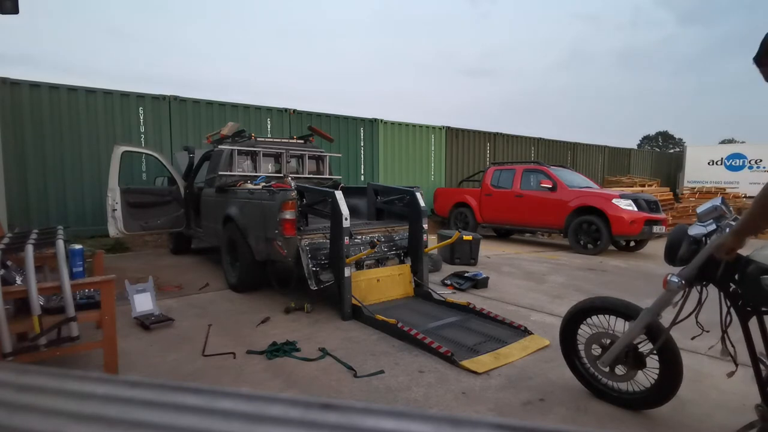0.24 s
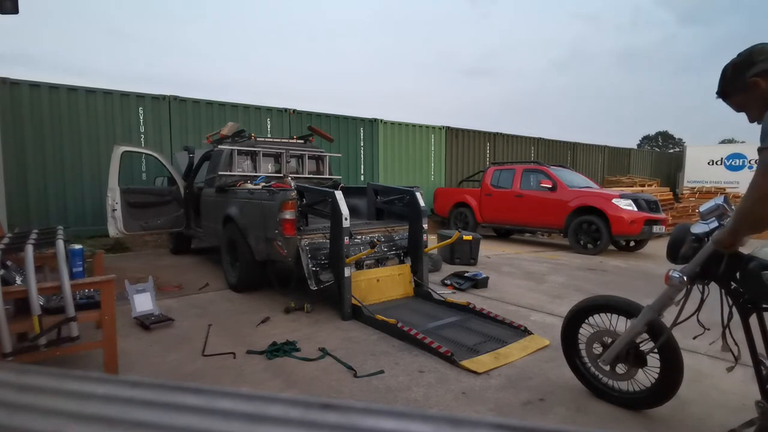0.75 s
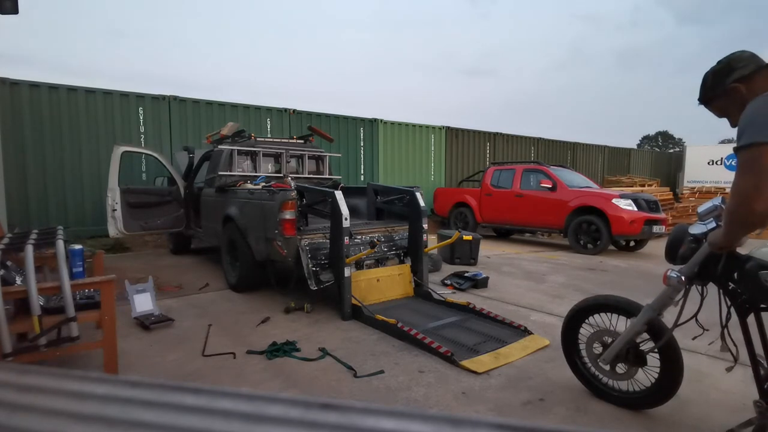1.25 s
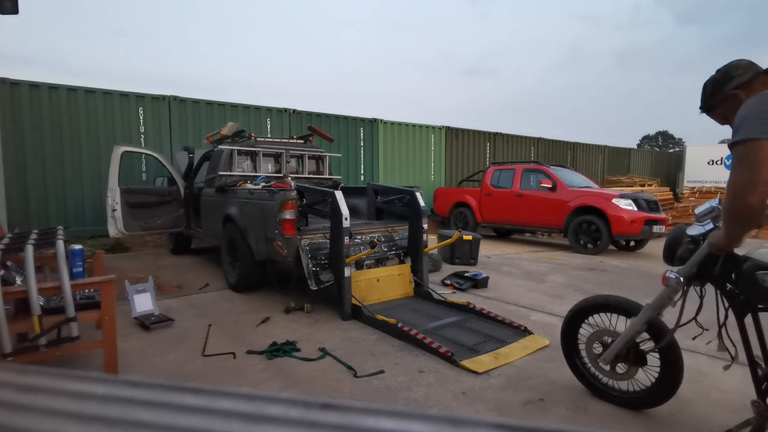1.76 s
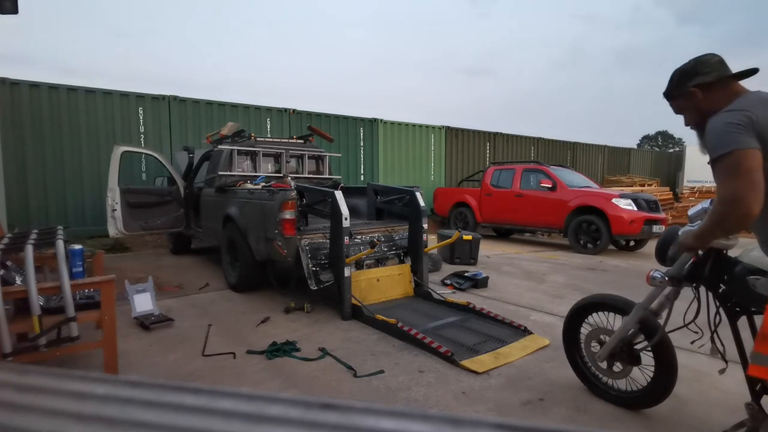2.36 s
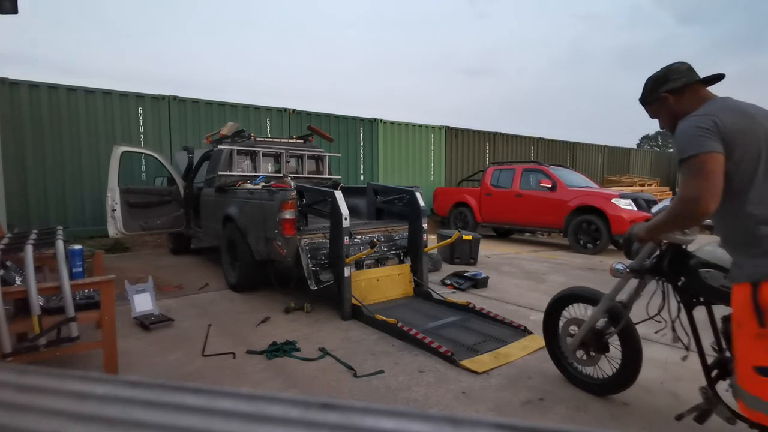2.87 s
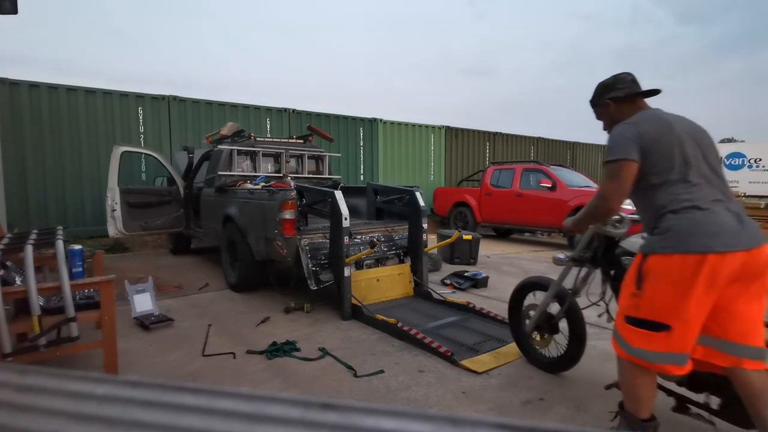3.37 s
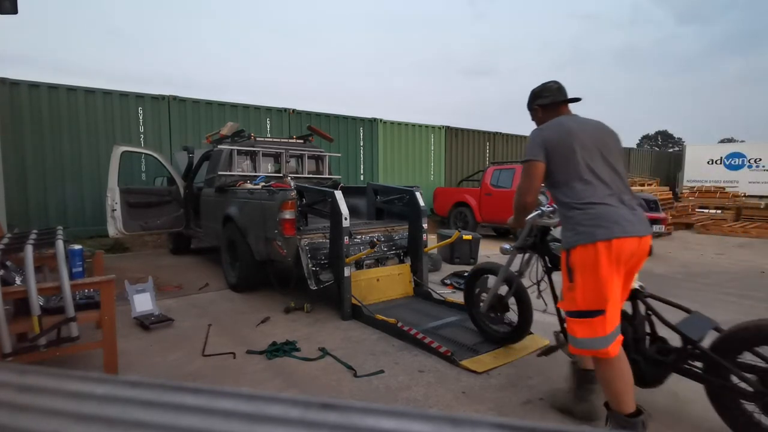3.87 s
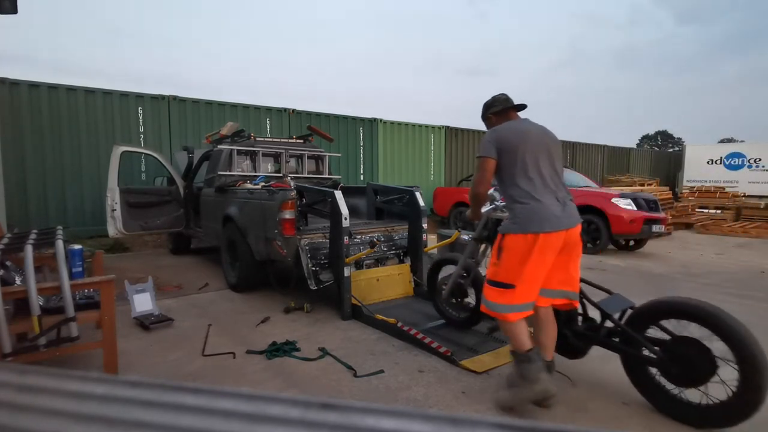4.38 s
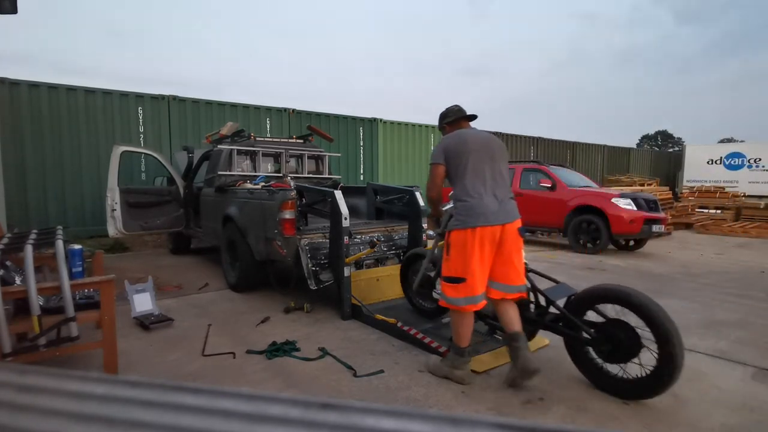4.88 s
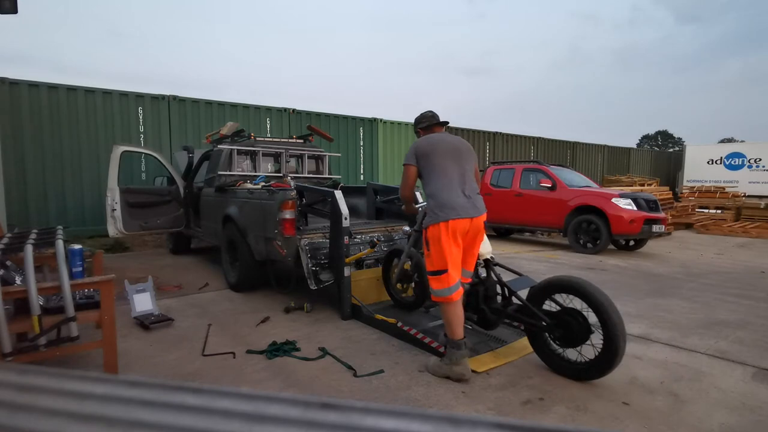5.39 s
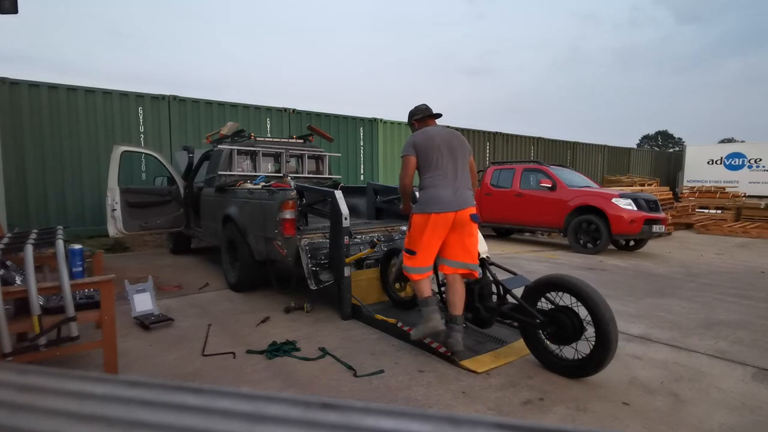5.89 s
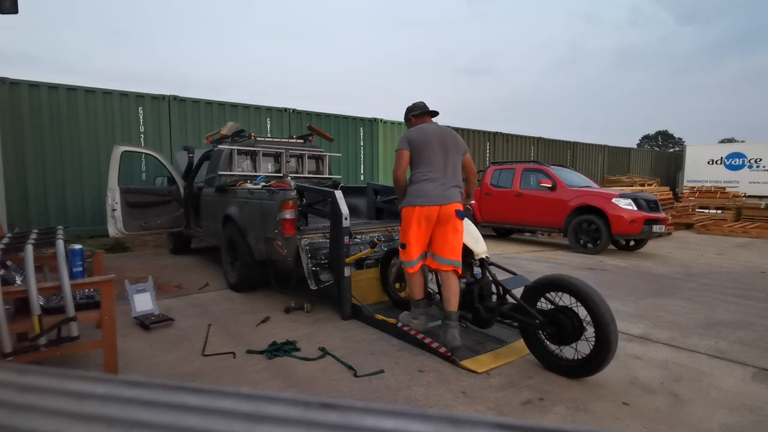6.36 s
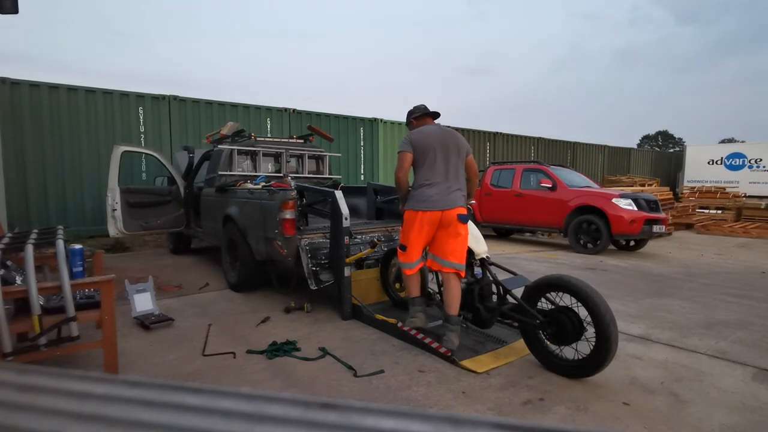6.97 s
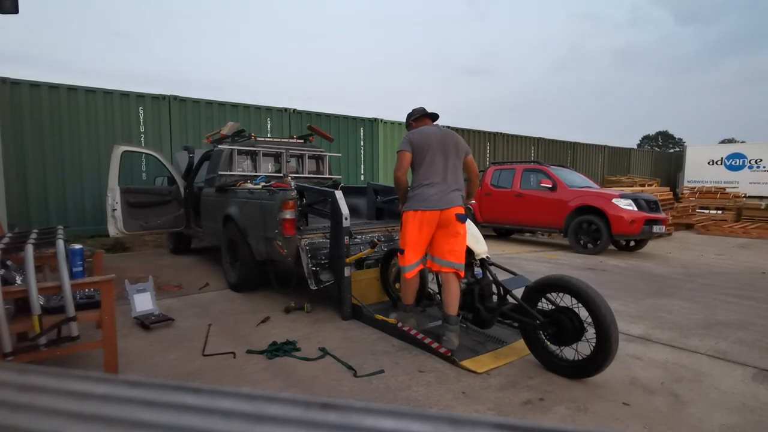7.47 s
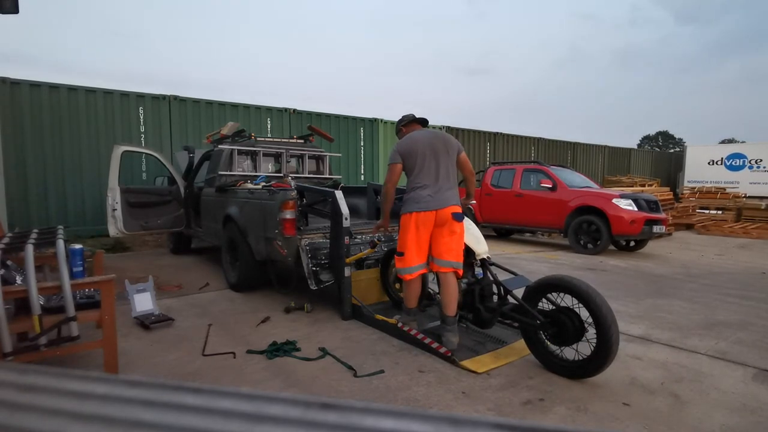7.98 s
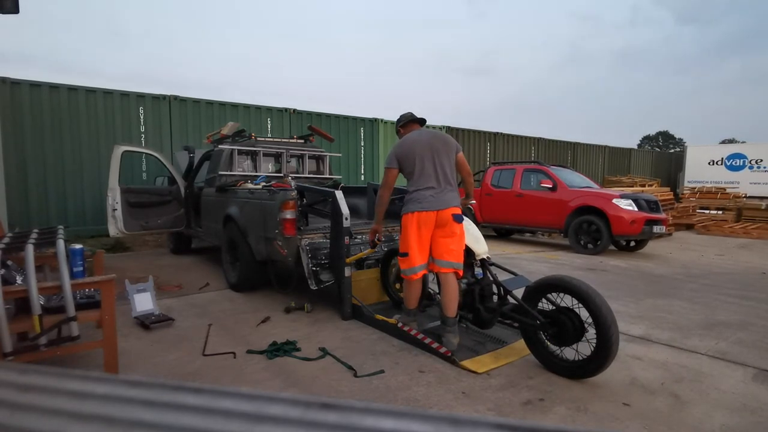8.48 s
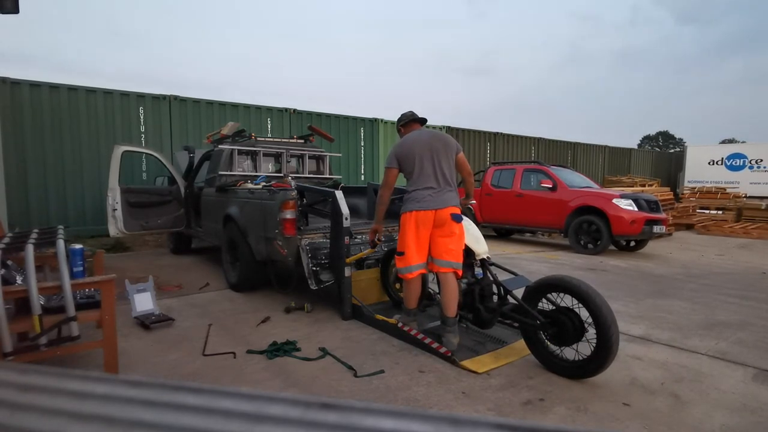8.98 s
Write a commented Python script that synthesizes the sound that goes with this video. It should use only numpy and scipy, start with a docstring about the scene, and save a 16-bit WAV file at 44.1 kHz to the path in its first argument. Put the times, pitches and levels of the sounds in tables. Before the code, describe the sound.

A sharp metallic stand snap echoes outdoors, followed by footsteps, a rubbing tyre and heavy rattling clunks as a motorcycle rolls onto a steel lift.

```python
"""A motorcycle, engine off, is wheeled across a concrete yard onto the steel platform of a lift.
Its side stand bangs up: sharp cracks excite ringing modes, and a row of ribbed containers answers with a chirp.
The tyre groans as filtered stick-slip noise; the platform clanks and booms in swarms of contacts and low swings.
Boots scuff and thud, far engines hum in the open air, and the microphone housing dulls the treble."""
import sys
import numpy as np
from scipy import signal
from scipy.fft import rfft, irfft, next_fast_len
from scipy.io import wavfile
from scipy.ndimage import uniform_filter1d, minimum_filter1d

SR = 44100
rng = np.random.default_rng(int(sys.argv[2]) if len(sys.argv) > 2 else 0)


def unload_wav(signal):
    """Save mono or channel-first audio to the path in sys.argv[1] as 16-bit WAV at rate SR, clipped to [-1, 1]."""
    wavfile.write(
        sys.argv[1],
        SR,
        np.round(np.clip(np.atleast_2d(signal).T, -1, 1) * 32767).astype(np.int16),
    )


N = 407484

# open air with far traffic, relative noise spectrum: (frequency [Hz], level [dB])
AIR_TONE = [(20, -1), (40, 3), (60, 7), (110, 1.5), (330, -3.5), (620, -3.5), (900, -3), (1060, -0.5),
            (1210, 4), (1480, -5), (1850, -3), (3200, -17.5), (5500, -21), (8500, -18), (15000, -9)]
AIR_DB, AIR_DRIFT_DB_PER_S = -54.5, -0.1321
# two far engines change speed: (time [s], pitch [Hz])
WHINE_PITCH = [(2.5, 398), (4.5, 494), (5.9, 450), (6.7, 455.8), (7.4, 427.6), (9.24, 455)]
HUM_PITCH = [(7.6, 177.9), (8.8, 215.3), (9.24, 203.5)]
# each is loudest as it passes: (time [s], level [dB], fall to either side [dB/s])
WHINE_PASS, HUM_PASS = (5.3, -65.5, 2.5), (9.2, -65.5, 1.3)

# how long the yard's tail takes to fall by 60 dB: (frequency [Hz], t60 [s])
YARD_DECAY = [(100, .7), (400, 1.2), (1100, 1.35), (2500, 1.5), (5500, 0.67), (9000, .6), (14000, 0.59)]
# a van, the containers and the far side of the yard answer:
# (delay [s], level [dB], rise [s], decay [s], high edge [Hz])
YARD_ECHOES = [(.125, -27, .035, .045, 5000), (.288, -32.5, .006, .075, 6010), (.39, -36, .04, .07, 2610)]

# a boot lands and its sole drags on gritty concrete or tread plate:
# (time [s], sole level [dB], drag build-up [s], grit pitch [Hz], heel level [dB])
BOOT_STEPS = [(.17, -54.5, 0.13, 4650, -63), (0.299, -39.5, 0.046, 2780, -61),
              (.859, -41, 0.015, 3630, -49.5), (.925, -48.5, .008, 2394, -40),
              (1.005, -55.5, .008, 2680, -56), (1.449, -58, 0.005, 3830, -68),
              (1.61, -48, 0.081, 3000, -69), (2.35, -50, 0.031, 6240, -69),
              (2.915, -52.5, 0.022, 3600, -71), (3.017, -51.5, 0.0078, 3500, -66),
              (3.362, -35, 0.034, 3100, -44.5), (4.074, -44, 0.0058, 3690, -48),
              (4.095, -45, 0.009, 3615, -66), (4.663, -41, 0.037, 3700, -56),
              (6.62, -49.5, 0.031, 3600, -58), (7.015, -49.5, 0.018, 3200, -62),
              (7.044, -39.5, .008, 3240, -47.5), (7.131, -49, .004, 2700, -52.5),
              (7.165, -54.5, .008, 3050, -60)]
# tone of a sole on concrete: (frequency [Hz], level [dB])
SOLE_TONE = [(1200, -2.5), (2300, 4.5), (3500, -3.5), (5500, 0.5), (9000, -1)]
SOLE_DECAY_S, SOLE_SPREAD = .029, 1.75  # the grit spans this ratio below and above its pitch
HEEL_HZ, HEEL_DECAY_S = 241, 0.021
# the boots shift lightly between steps: (start [s], end [s], level [dB])
BOOT_SHUFFLES = [(0.546, .65, -62), (1.12, 1.18, -61.5), (2.578, 2.9, -57.5), (7.562, 7.78, -62)]
SHUFFLES_PER_S, SHUFFLE_DRAG_S, SHUFFLE_HZ = 19, .02, 3600

# a faint hiss and low rumble swell and fade as the bike moves; levels are those at the fullest
MOVE_START_S, MOVE_FULLEST_S, MOVE_STOP_S = 1.4, 3.7, 6.7
HISS_DB, RUMBLE_DB = -63, -62.5
# dull low thuds of heels, tyres and frame: (time [s], level [dB], pitch [Hz], decay [s])
LOW_THUDS = [(2.574, -36.5, 269, 0.0058), (3.59, -50, 584, 0.026), (3.701, -47, 418, 0.084),
             (3.875, -41, 401, 0.049), (5.438, -42, 235.3, 0.026), (5.629, -34.5, 194, 0.013),
             (5.882, -52.5, 263, 0.026), (6.823, -48.5, 329, .01), (6.846, -44, 275, .019),
             (7.903, -47.5, 301.5, 0.0072), (7.985, -55, 380, 0.065)]
# brief narrow squeaks, rings and knocks: (time [s], level [dB], length [s], pitch [Hz])
NARROW_SOUNDS = [(.55, -59.5, 0.046, 5180), (1.002, -51.5, 0.033, 2060), (6.632, -45, 0.022, 850),
                 (7.043, -39, 0.041, 2274), (7.132, -49, 0.019, 2360), (7.324, -63.5, .04, 5030),
                 (7.623, -57, 0.031, 5140), (7.67, -67.5, 0.083, 4970), (8.351, -69, 0.13, 4930),
                 (8.739, -42, 0.013, 5830), (8.752, -45, 0.019, 5200)]
NARROW_SWELL = .33  # share of its length in which each builds up
# small metal parts click: (time [s], level [dB], decay [s], pitch [Hz])
METAL_CLICKS = [(6.559, -38.5, 0.025, 7050), (6.869, -57, .008, 9500), (7.05, -51, .028, 9200),
                (8.738, -49, .006, 5590), (8.750, -34.5, 0.011, 9220)]
CLICK_RISE_S, CLICK_SPREAD = 0.0067, 1.6  # spread: ratio below and above the pitch

# the whole platform bounces on its arms: (time [s], level [dB], pitch [Hz], decay [s], length [s])
PLATFORM_BOUNCES = [(5.641, -26, 80, 0.019, 0.092), (5.677, -39.5, 100.4, 0.069, 0.1),
                    (5.772, -41, 76.4, 0.037, 0.15), (5.885, -33.5, 84, 0.015, 0.09),
                    (5.893, -36.5, 63.5, 0.15, 0.17)]
# loose steel of platform and bike rattles as the load shifts:
# (time [s], rattle level [dB], decay [s], pitch [Hz], panel thud level [dB])
STEEL_CLANKS = [(3.673, -30, 0.025, 1954, -53), (3.849, -46, 0.036, 1090, -53),
                (5.531, -25, 0.032, 1840, -38), (5.560, -34.5, 0.036, 1060, -38.5),
                (5.638, -43.5, 0.035, 2700, -40), (5.724, -30, .018, 1960, -38),
                (5.770, -35.5, 0.02, 890, -38), (6.940, -44, 0.043, 2080, -61),
                (7.946, -35, .025, 1900, -48.5), (8.596, -50.5, 0.034, 1800, -64.5)]
# what the platform rings with: (frequency [Hz], relative level [dB], t60 [s])
PLATFORM_MODES = [(568, 1.5, 0.086), (659, -5, 0.16), (1032, -6, 0.25), (1220, -7.5, 0.27),
                  (1446, 5.5, 0.059), (1572, 5.5, 0.055), (1723, -11, 0.1), (1887, -1, 0.14),
                  (2076, -1.5, 0.049), (2133, 5.5, 0.052), (2650, -5.5, 0.081), (2820, -15, 0.18),
                  (3220, -6, 0.043), (3650, -34, 0.049), (4030, -10, 0.03), (4850, -0.5, 0.055)]
CLANK_RISE_S, CLANK_SPREAD = 0.0037, 2.22  # the rattle spans this ratio below and above its pitch
PANEL_HZ, PANEL_DECAY_S = 322, 0.042

# the tyre is shoved along the plate; each shove grabs and then eases: (time [s], level [dB], length [s])
TYRE_SHOVES = [(5.176, -42.5, .1), (5.277, -47, .11), (5.366, -47.5, 0.17)]
SHOVE_ATTACK_S, SHOVE_RELEASE_S = 0.013, 0.083
# resonances that sing under the rubbing tyre: (frequency [Hz], width [Hz], relative level [dB])
TYRE_PEAKS = [(569, 38, -3.5), (721, 13, -6), (1186, 16, 2.5), (1454, 39, -3.5), (1825, 60, -7.5),
              (2050, 19, -4), (2450, 35, -7.5), (2860, 33, -13)]

# the stand hits the frame and chatters: (time [s], force [dB])
STAND_HITS = [(1.7549, -11), (1.7569, 6), (1.7625, 4.5), (1.769, -8.5)]
# what stand and frame ring with: (frequency [Hz], level at zero force [dB], t60 [s])
FRAME_MODES = [(423, -33, 0.18), (769, -30.5, 0.16), (953, -32.5, .25), (1090, -32, .22), (1167, -23, 0.35),
               (1404, -33.5, 0.29), (1470, -32.5, 0.038), (2000, -18, .055), (2080, -18, 0.088),
               (2308, -23.5, 0.035), (2480, -25.5, 0.06), (2977, -21.5, 0.1), (3340, -30, .09),
               (3700, -21.5, 0.059), (4770, -20.5, 0.036), (5065, -24, 0.063), (5850, -23.5, .045)]

# the shaded left port against the right one: (frequency [Hz], relative level [dB])
PORT_SHADE = [(100, -7), (400, -8.5), (1000, -10.5), (2000, -18.5), (3600, -15.5), (5200, -22.5),
              (7000, -14.5), (9000, -6.5), (11000, -11.5), (15000, -10.5)]
# its phase beyond the plain delay: (frequency [Hz], phase [rad])
PORT_PHASE = [(60, -.12), (400, -0.41), (1000, -0.23), (2200, 0.16), (3500, -0.0041), (6000, -0.18)]
# how alike the ports hear: (frequency [Hz], likeness [0-1])
PORT_LIKENESS = [(200, 1), (1300, 0.86), (2100, 1), (3200, .7), (5000, 0.16)]
PORT_DELAY_S = 8e-5
# the housing's treble loss: (frequency [Hz], level [dB])
HOUSING_TONE = [(5600, 0), (6300, -5.5), (7200, -10), (8600, -19.5), (10000, -25), (14500, -30)]
EDGE_HZ = 15100  # upper limit of the whole band


def amp(db):
    """Decibels to an amplitude factor."""
    return 10 ** (np.asarray(db) / 20)


def evened(x):
    """Scales x to rms 1."""
    return x / np.sqrt(np.mean(x ** 2) + 1e-20)


def read(points, hz):
    """Reads a spectrum table on a log-frequency axis."""
    f, value = np.transpose(points)
    return np.interp(np.log(hz + 1), np.log(f + 1), value)


def follow(rows):
    """A (time [s], value) curve at every sample."""
    return np.interp(np.arange(N) / SR, *np.transpose(rows))


def add(mix, s, sound):
    """Lays a sound into the mix at s seconds, cut at the end."""
    part = mix[round(s * SR):][:len(sound)]
    part += sound[:len(part)]


def colour(x, points):
    """Shapes x by a (frequency [Hz], level [dB]) table."""
    hz = np.fft.rfftfreq(len(x), 1 / SR)
    return irfft(rfft(x) * amp(read(points, hz)), len(x))


def band(x, low_hz, high_hz, order=2):
    """High-pass and low-pass in series."""
    for hz, kind in ((low_hz, "high"), (high_hz, "low")):
        b, a = signal.butter(order, min(hz, SR / 2 - 1000), kind, fs=SR)
        x = signal.lfilter(b, a, x)
    return x


def around(hz, spread):
    """The edges of a band that spans a ratio below and above hz."""
    return hz / spread, hz * spread


def slow(count):
    """Smooth random drift of rms 1 that changes over about count samples."""
    smooth = uniform_filter1d(rng.standard_normal(N), count)
    return evened(uniform_filter1d(smooth, count))


def swell_and_decay(t, rise, decay):
    """A straight rise over an exponential decay that begins at its top; all in seconds."""
    return np.minimum(t / rise, 1) * np.exp(-np.maximum(t - rise, 0) / decay)


def ring(modes):
    """One second of decaying modes, neighbours in opposite sign."""
    t = np.arange(SR) / SR
    out = np.zeros(SR)
    for k, (hz, db, t60) in enumerate(modes):
        out += (-1) ** k * amp(db - 60 * t / t60) * np.sin(2 * np.pi * hz * t)
    return out


def contacts(rise, decay, low_hz, high_hz, grain_db):
    """A swarm of tiny uneven impacts that swells and dies away; they come in clumps."""
    t = np.arange(SR) / SR
    grains, clumps = rng.standard_normal((2, SR))
    grains = np.repeat(grains, 30)[:SR]  # each grain lasts 30 samples
    clumps = np.interp(t * 220, np.arange(SR), clumps)  # 220 clump values per second
    sizes = amp(grain_db * (grains + .4 * clumps))
    swarm = evened(band(sizes * rng.standard_normal(SR), low_hz, high_hz))
    shape = swell_and_decay(t, rise, decay)
    shaped = swarm * shape
    return shaped * np.linalg.norm(shape) / np.linalg.norm(shaped)  # the same energy every time


def scrapes(rows, grain_db, body_db, ring_share=0.49):
    """Grains of friction over a weak duller body; each spot rubbed has brief resonances of its own."""
    out = np.zeros(N)
    for s, db, rise, decay, low_hz, high_hz in rows:
        grit = contacts(rise, decay, low_hz, high_hz, grain_db)
        grit += amp(body_db) * contacts(rise, decay, 600, 2600, grain_db)
        spot = rng.standard_normal(600) * np.exp(-np.arange(600) / 130)
        spot /= np.linalg.norm(spot)
        sound = grit + ring_share * signal.fftconvolve(grit, spot)[:SR]
        add(out, s, amp(db) * sound * np.linalg.norm(grit) / np.linalg.norm(sound))
    return out


def thumps(rows, swing_db=-3, puff_db=-3, rise_cycles=0.99):
    """A damped low swing with a puff of noise round its pitch."""
    out, t = np.zeros(N), np.arange(SR) / SR
    for s, db, hz, decay in rows:
        rise = rise_cycles / hz
        swing = np.sin(2 * np.pi * hz * t) * swell_and_decay(t, rise, decay)
        puff = contacts(rise, decay * 1.3, hz * 0.85, hz * 0.97, grain_db=-0.5)
        puff = band(puff, 30, hz * 3.6)
        add(out, s, amp(db) * (amp(swing_db) * swing + amp(puff_db) * puff))
    return out


def sharp_treble(rows, low_hz=8500):
    """A fine, sharp high-treble layer: rows of (time [s], level [dB], rise [s], decay [s])."""
    out = np.zeros(N)
    for s, db, rise, decay in rows:
        add(out, s, amp(db) * contacts(rise, decay, low_hz, 14500, grain_db=5))
    return out


def air(swell_db=.5):
    """The wash of the open air: coloured noise that wavers gently and eases off slowly."""
    level_db = AIR_DB + AIR_DRIFT_DB_PER_S * np.arange(N) / SR
    wash = evened(colour(rng.standard_normal(N), AIR_TONE))
    return wash * amp(level_db + swell_db * slow(count=4000))


def traffic(waver=.008, flutter=0.77):
    """Far engines as single tones, their pitch and level blurred by the moving air."""
    out, t = np.zeros(N), np.arange(N) / SR
    for pitch, (nearest_s, db, fall_db) in ((WHINE_PITCH, WHINE_PASS), (HUM_PITCH, HUM_PASS)):
        turns = np.cumsum(follow(pitch) * (1 + waver * slow(count=900))) / SR
        level = amp(db - fall_db * abs(t - nearest_s))
        out += level * np.sin(2 * np.pi * turns) * (1 + flutter * slow(count=1500))
    return out


def yard(x, tail_db=-17.5, wall_s=.29, ribs_db=-29, ribs_hz=1114):
    """A thin outdoor tail, smeared echoes of van and walls, and the pitched echo of even container ribs."""
    hz, t, z = signal.stft(rng.standard_normal(2 * SR), SR, nperseg=256)
    tone = [(150, -3.5), (450, 6), (1100, 5.5), (2200, -2), (5300, -1.5), (8000, -4.5), (13000, -10.5)]
    start_db = read(tone, hz)[:, None]
    fall_db = 60 * t / read(YARD_DECAY, hz)[:, None]
    tail = signal.istft(z * amp(start_db - fall_db), SR, nperseg=256)[1]
    t = np.arange(len(tail)) / SR
    tail *= np.clip(t / 0.026, 0, 1)  # fades in over 26 ms
    tail *= amp(tail_db) / np.linalg.norm(tail)
    for s, db, rise, decay, top_hz in YARD_ECHOES:
        echo = contacts(rise, decay, 550, top_hz, grain_db=5)
        add(tail, s, amp(db) * echo / np.linalg.norm(echo))
    # the ribs' pitch glides upwards, through ribs_hz at wall_s
    ribs = np.sin(2 * np.pi * ribs_hz * (t + 0.32 * (t - wall_s) ** 2))
    ribs *= np.exp(-((t - wall_s) / 0.035) ** 2)
    tail += amp(ribs_db) * ribs / np.linalg.norm(ribs)
    return signal.fftconvolve(x, tail)[:N]


def boots(shuffle_scatter_s=0.014, shuffle_uneven_db=1.0, treble_db=-15):
    """Steps of heel thud and gritty scuff with a sharp treble layer; loosely timed light shuffles between."""
    scuffs, heels, treble = [], [], []
    for s, db, drag, hz, heel_db in BOOT_STEPS:
        scuffs.append((s, db, drag, SOLE_DECAY_S, *around(hz, SOLE_SPREAD)))
        heels.append((s, heel_db, HEEL_HZ, HEEL_DECAY_S))
        treble.append((s, db + treble_db, drag, SOLE_DECAY_S))
    shuffle_band = around(SHUFFLE_HZ, SOLE_SPREAD)
    for start, end, db in BOOT_SHUFFLES:
        for s in np.arange(start, end, 1 / SHUFFLES_PER_S):
            late, force = rng.standard_normal(2)
            s_scattered = s + shuffle_scatter_s * late
            uneven_db = db + shuffle_uneven_db * force
            scuffs.append((s_scattered, uneven_db, SHUFFLE_DRAG_S, SOLE_DECAY_S, *shuffle_band))
    soles = colour(scrapes(scuffs, grain_db=2.5, body_db=-7), SOLE_TONE)
    return thumps(heels) + sharp_treble(treble) + soles


def hiss_and_rumble():
    """A faint hiss and low rumble, two bands of noise that swell and fade as the bike moves."""
    hiss = evened(band(rng.standard_normal(N), 2600, 8900))
    rumble = evened(band(rng.standard_normal(N), 35, 180))
    swell = follow([(MOVE_START_S, 0), (MOVE_FULLEST_S, 1), (MOVE_STOP_S, 0)])
    return (amp(HISS_DB) * hiss + amp(RUMBLE_DB) * rumble) * swell


def squeaks_and_knocks(partner_db=-6, partner_ratio=0.51):
    """Brief squeaks, rings and knocks: contacts in one narrow resonance, with a weaker partner below it."""
    out = np.zeros(N)
    for s, db, length, hz in NARROW_SOUNDS:
        rise, decay = NARROW_SWELL * length, (1 - NARROW_SWELL) * length
        rub = contacts(rise, decay, hz * 0.75, hz * 1.9, grain_db=0)
        main = signal.lfilter(*signal.iirpeak(hz, 28, fs=SR), rub)
        partner = signal.lfilter(*signal.iirpeak(hz * partner_ratio, 28, fs=SR), rub)
        tone = main + amp(partner_db) * partner
        add(out, s, amp(db) * tone * np.linalg.norm(rub) / np.linalg.norm(tone))
    return out


def clicks():
    """Short bright scrapes of metal on metal."""
    rows = [(s, db, CLICK_RISE_S, decay, *around(hz, CLICK_SPREAD)) for s, db, decay, hz in METAL_CLICKS]
    return scrapes(rows, grain_db=7.5, body_db=-13.5)


def booms(rise=.01, shudder_db=-11):
    """The platform's bounce as a damped low swing, with a shudder of its panels above it."""
    out, t = np.zeros(N), np.arange(SR) / SR
    for s, db, hz, decay, length in PLATFORM_BOUNCES:
        swing = np.sin(2 * np.pi * hz * t) * swell_and_decay(t, rise, decay)
        shudder = band(contacts(rise, decay, hz, hz * 2.9, grain_db=1.0), hz, hz * 4)
        fade = np.clip((length - t) / 0.019, 0, 1)  # stopped over the last 19 ms
        add(out, s, amp(db) * (swing + amp(shudder_db) * shudder) * fade)
    return out


def clanks(ring_share=amp(-2) / 2, treble_db=-36, treble_growth=1.4):
    """Rattling contacts, direct and through the platform's modes, with panel thuds and sharp treble."""
    out, deck = np.zeros(N), ring(PLATFORM_MODES)
    deck *= ring_share / np.linalg.norm(deck)
    hardest_db = max(row[1] for row in STEEL_CLANKS)
    treble, panels = [], []
    for s, db, decay, hz, thud_db in STEEL_CLANKS:
        rattle = contacts(CLANK_RISE_S, decay, *around(hz, CLANK_SPREAD), grain_db=2.0)
        sound = rattle + signal.fftconvolve(rattle, deck)[:SR]
        add(out, s, amp(db) * sound * np.linalg.norm(rattle) / np.linalg.norm(sound))
        # the treble layer grows faster than the clank itself, so it favours the hard ones
        treble.append((s, treble_db + treble_growth * (db - hardest_db), CLANK_RISE_S, .012))
        panels.append((s, thud_db, PANEL_HZ, PANEL_DECAY_S))
    return out + sharp_treble(treble) + thumps(panels)


def groan(rub_db=-23, screech_db=-3, screech_hz=2950):
    """Rubber sticks and slips on the plate and keeps resonances singing; hard shoves screech most."""
    hz = np.fft.rfftfreq(N, 1 / SR)
    body = sum(amp(db) / (1 + 2j * (hz - f) / width) for f, width, db in TYRE_PEAKS)
    slips = irfft(rfft(rng.standard_normal(N)) * (body + amp(rub_db)), N)
    song = evened(band(slips, 470, 3220, order=6))
    t, force = np.arange(N) / SR, np.zeros(N)
    for s, db, length in TYRE_SHOVES:
        grab = np.clip((t - s) / SHOVE_ATTACK_S, 0, 1)
        ease = np.clip((s + length - t) / SHOVE_RELEASE_S, 0, 1) ** .5
        force += amp(db) * grab * ease
    # ratio 0.92 crosses the two edges, leaving a narrow peak
    screech = evened(band(rng.standard_normal(N), *around(screech_hz, 0.92), order=7))
    screech *= (force / force.max()) ** 3
    judder = amp(2.3 * slow(count=120))
    return (song + amp(screech_db) * screech) * force * judder


def stand(crack_db=-11, crack_decay=.005, clatter_db=-22, clatter_decay=0.04, modes_share=0.76):
    """Blows crack and ring the frame's strong modes; the second also sets off a clatter of weak ones.
    Returns the direct sound and the more even one that spreads round the yard."""
    tones, crash, frame = np.zeros(N), np.zeros(N), ring(FRAME_MODES)
    for s, db in STAND_HITS:
        add(tones, s, amp(db) * frame)
        crack = contacts(0.00047, crack_decay, 1000, 11000, grain_db=8.5)
        add(crash, s, amp(db + crack_db) * crack)
    tones *= 1 + 0.23 * slow(count=350)  # a random waver roughens the ring
    clatter = contacts(0.0017, clatter_decay, 120, 13000, grain_db=2.0)
    clatter_tone = [(200, -4.0), (600, 3), (1200, 11.5), (2500, 5), (6000, 5.5), (9000, -2.5)]
    add(crash, STAND_HITS[1][0], amp(clatter_db) * colour(clatter, clatter_tone))
    tones = band(tones, 250, 12000)
    crash = band(crash, 130, 15000, order=4)
    spread = modes_share * band(tones, 270, 1400) + crash
    return tones + crash, spread


def ports(x, left_db, scatter_s=.008):
    """The right port hears x; the left one hears it shaded, later, and scattered where likeness is low."""
    size = next_fast_len(N + SR)
    hz = np.fft.rfftfreq(size, 1 / SR)
    t = np.arange(SR // 10) / SR
    scatter = rng.standard_normal(SR // 10) * np.exp(-t / scatter_s)
    scatter = rfft(scatter / np.linalg.norm(scatter), size)
    same = np.clip(read(PORT_LIKENESS, hz), 0, 1)
    direct = same * np.exp(1j * (read(PORT_PHASE, hz) - 2 * np.pi * hz * PORT_DELAY_S))
    path = direct + np.sqrt(1 - same ** 2) * scatter
    shade = amp(read(PORT_SHADE, hz) + left_db)
    left = irfft(rfft(x, size) * path * shade, size)[:N]
    return np.array([left, x])


def scene():
    """The bang, the near sounds, the yard's answer and the open air, each through the two ports."""
    outdoors = ports(air() + traffic(), left_db=0.0, scatter_s=0.06)
    outdoors[0] += amp(-15.5) * air()  # the left port also has a wash of its own
    hard = clanks() + groan() + squeaks_and_knocks() + clicks() + booms()
    near = hard + thumps(LOW_THUDS) + hiss_and_rumble() + boots()
    bang, spread = stand()
    answer = yard(spread + amp(-10) * near)
    out = ports(bang, left_db=2.5, scatter_s=.003) + ports(near, left_db=0.47)
    return out + outdoors + ports(answer, left_db=5, scatter_s=0.016)


def record(dry, ceiling=0.74):
    """The housing dulls the treble and a fast limiter holds the loudest peaks; then the band limit."""
    dull = np.array([colour(channel, HOUSING_TONE) for channel in dry])
    headroom = np.minimum(ceiling / (abs(dull).max(0) + 1e-9), 1)
    gain = uniform_filter1d(minimum_filter1d(headroom, size=45), size=45)  # about 1 ms
    low_pass = signal.firwin(511, EDGE_HZ, window=("kaiser", 9), fs=SR)
    return signal.oaconvolve(dull * gain, low_pass[None], "same")


dry = scene()
out = record(dry)
unload_wav(out)
```